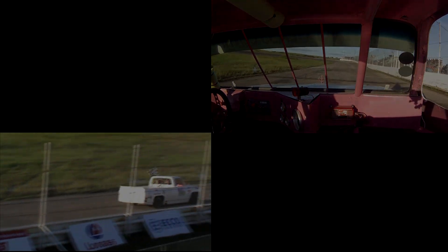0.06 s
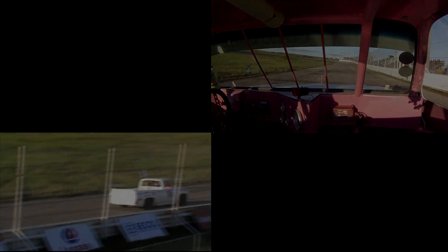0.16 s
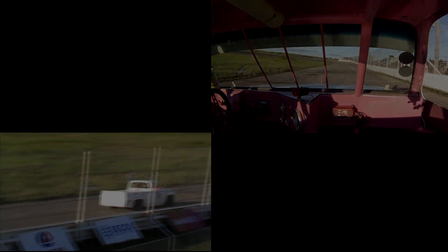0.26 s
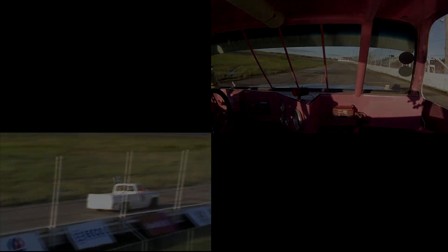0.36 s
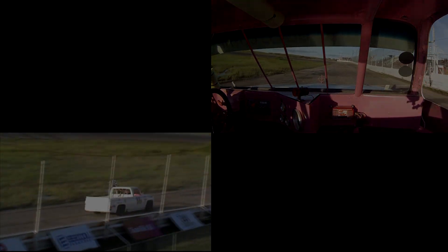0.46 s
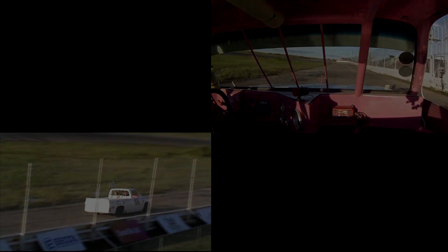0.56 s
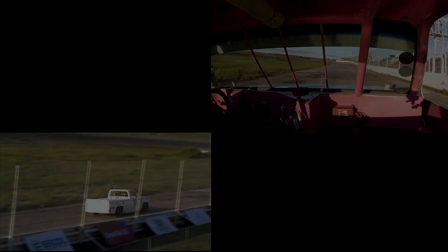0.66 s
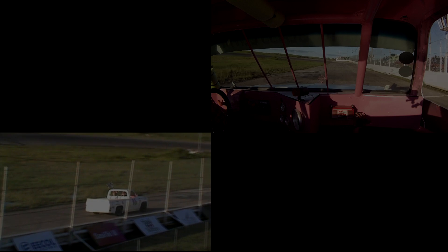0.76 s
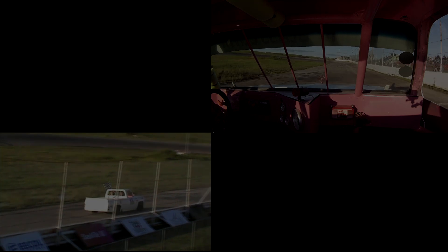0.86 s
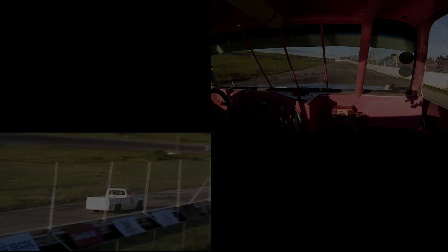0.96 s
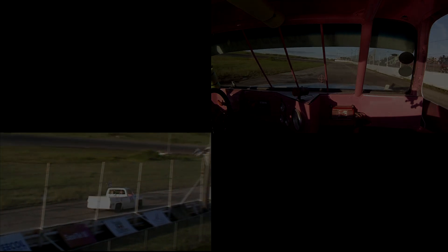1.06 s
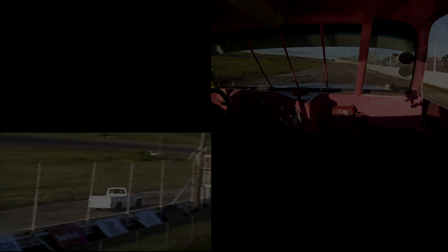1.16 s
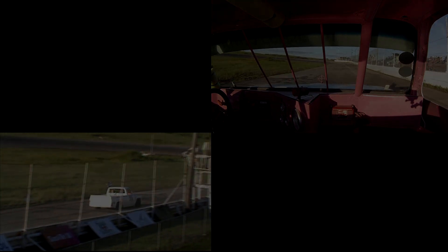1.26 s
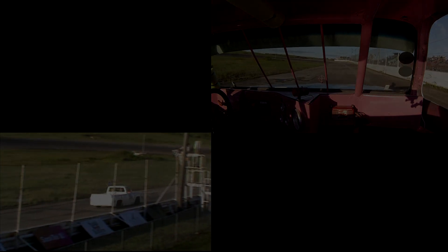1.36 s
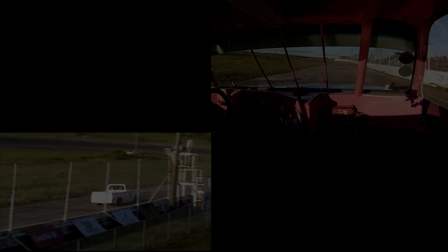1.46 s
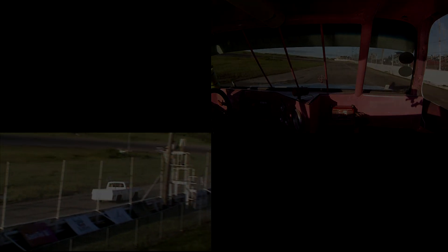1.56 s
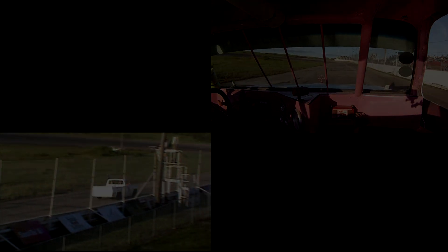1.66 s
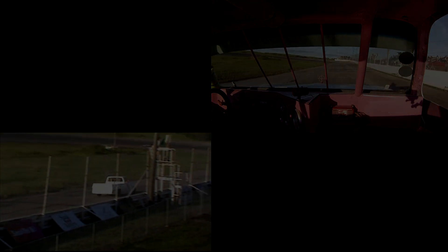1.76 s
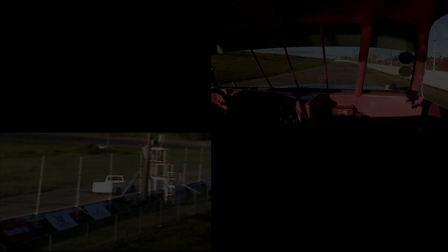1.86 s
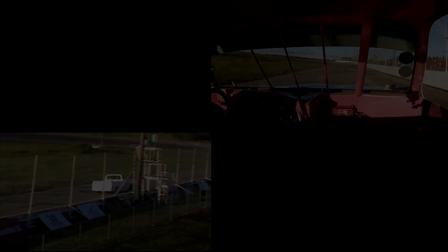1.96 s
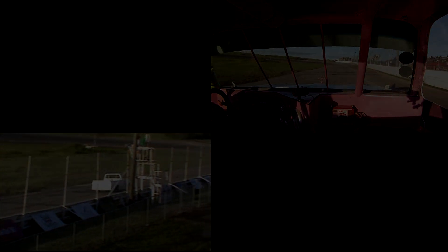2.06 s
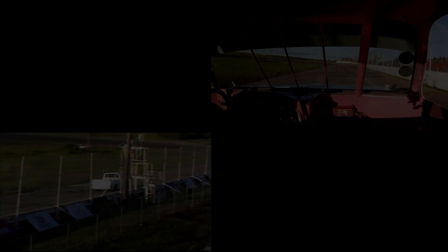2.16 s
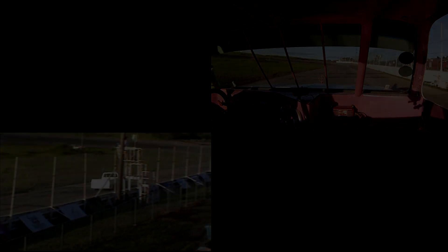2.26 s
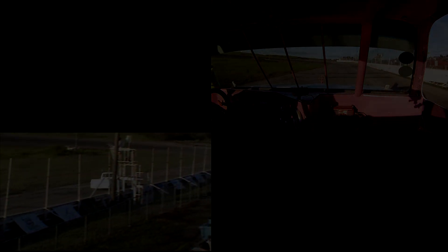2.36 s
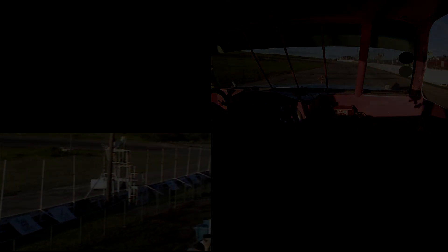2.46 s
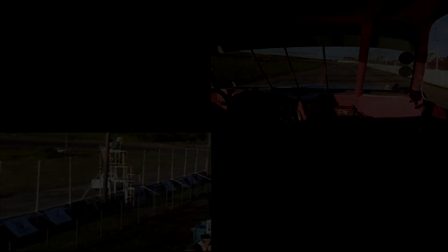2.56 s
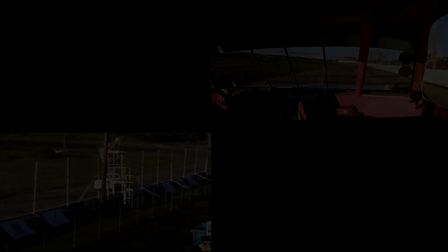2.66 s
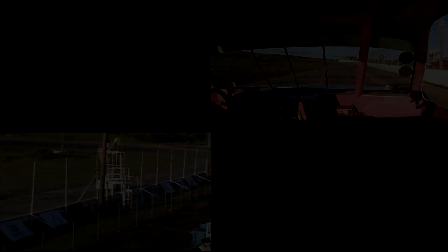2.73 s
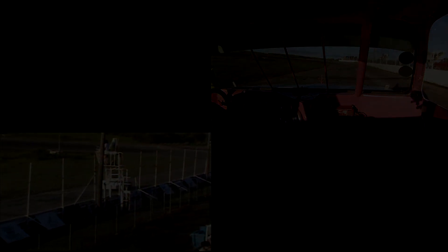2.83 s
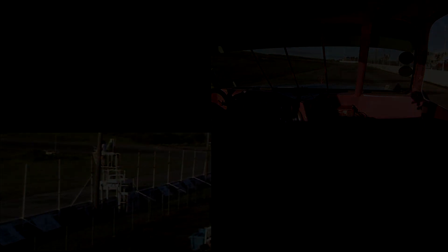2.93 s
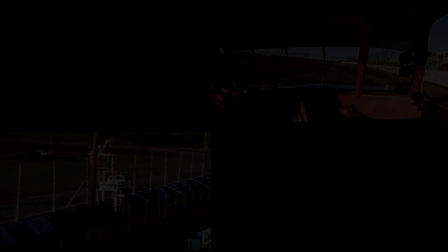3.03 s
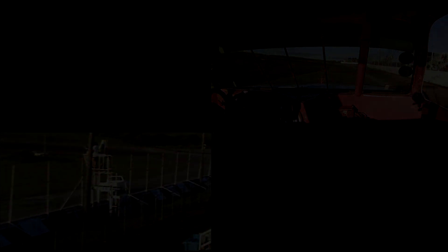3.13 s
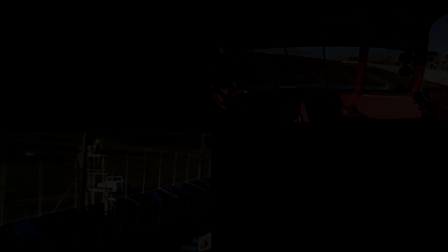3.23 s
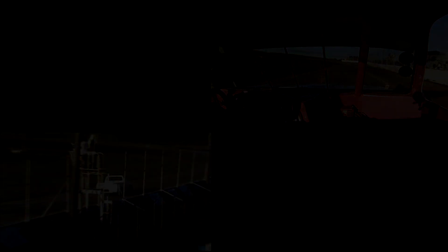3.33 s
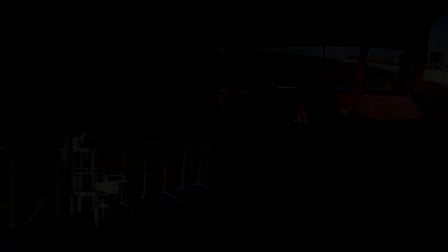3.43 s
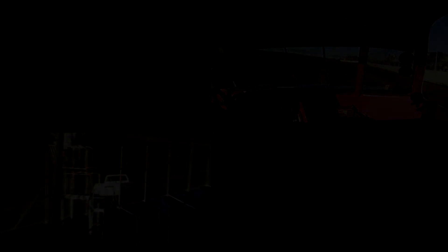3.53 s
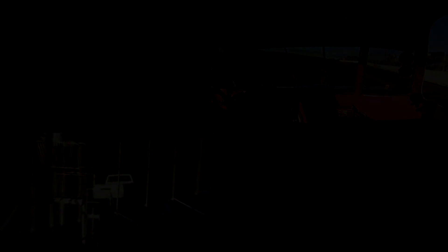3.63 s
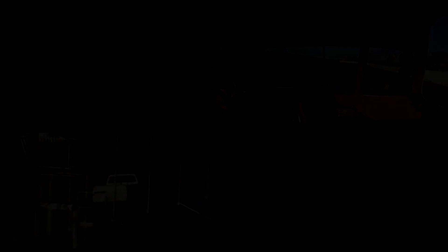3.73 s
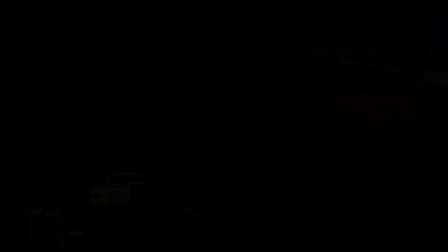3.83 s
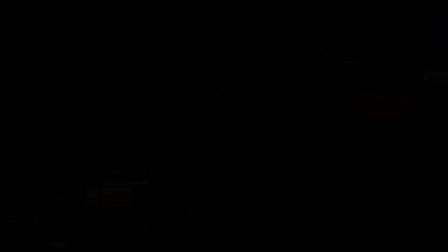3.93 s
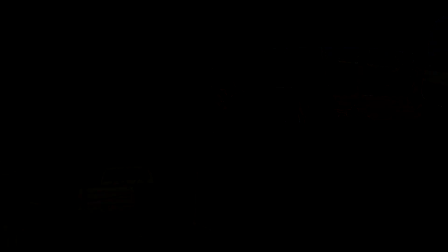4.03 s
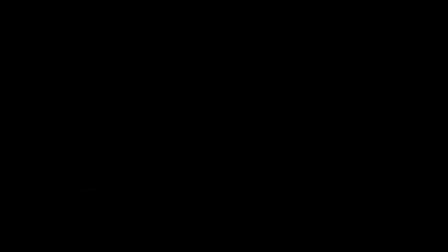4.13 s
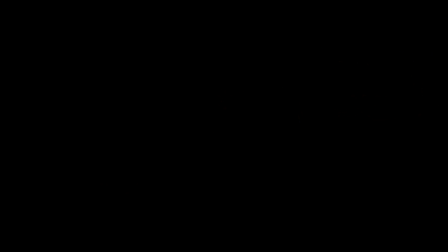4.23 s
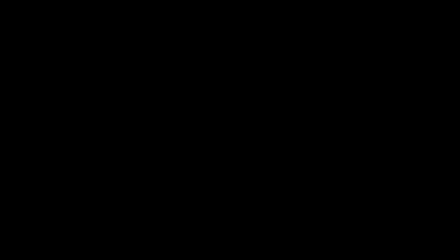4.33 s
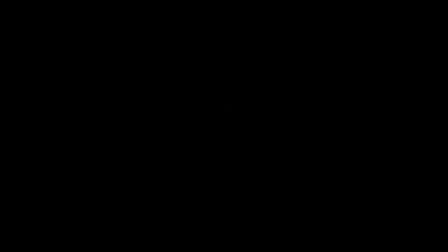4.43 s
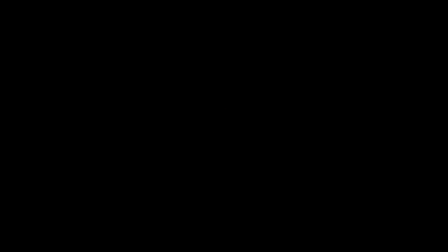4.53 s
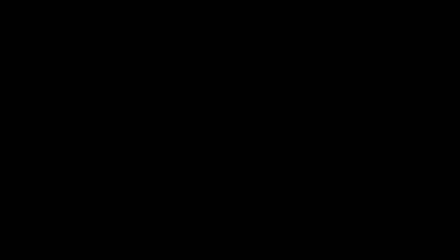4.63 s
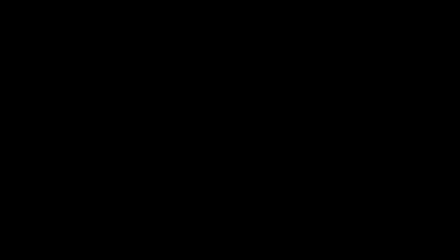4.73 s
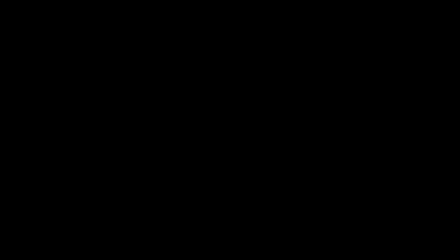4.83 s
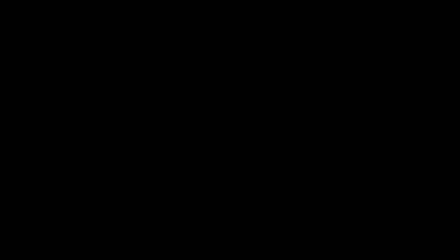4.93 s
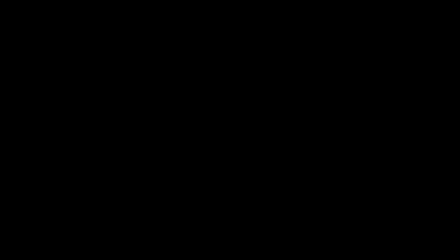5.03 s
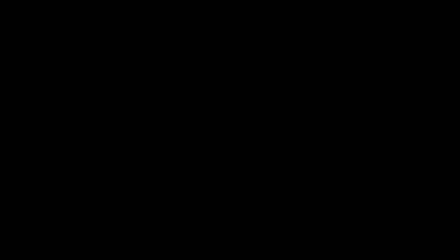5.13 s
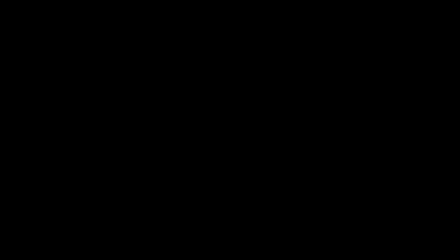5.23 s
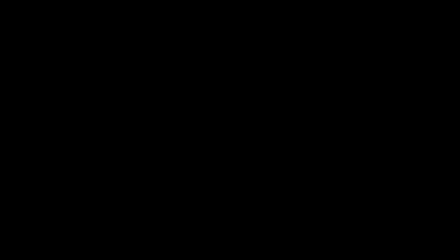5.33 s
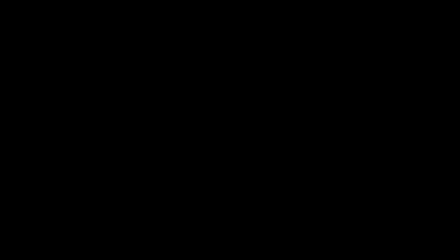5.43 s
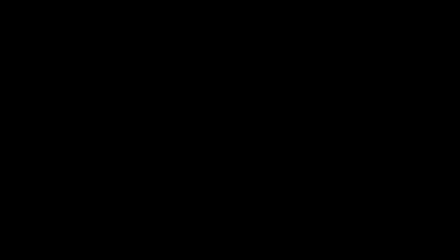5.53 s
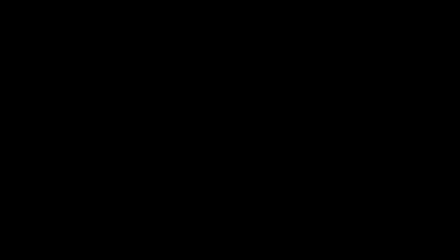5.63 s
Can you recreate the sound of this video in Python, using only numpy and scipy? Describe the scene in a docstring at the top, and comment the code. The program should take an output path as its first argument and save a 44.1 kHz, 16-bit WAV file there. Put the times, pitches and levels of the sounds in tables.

```python
"""V8 race truck in its bare cab: three rough stabs of throttle, then a long run-down to idle.
Engine: wavering cosine orders and scattered firing impulses ring the cab; filtered clicks crack and pop.
Gas: noise puffed by each firing. Track, tyres, panel: filtered noise. Shell knocks: clicks through resonances.
Loose metal: noise bursts rattle and decaying sines clank as the truck slows and the sound fades."""
import sys
import numpy as np
from scipy import signal
from scipy.fft import rfft, irfft
from scipy.io import wavfile
from scipy.ndimage import uniform_filter1d

SR = 44100
rng = np.random.default_rng(int(sys.argv[2]) if len(sys.argv) > 2 else 0)


def unload_audio(sound):
    """Save the sound as a 16-bit wav file, at the path given as the first command line argument."""
    columns = np.transpose(np.atleast_2d(sound))
    # keep every value between -1 and 1, then stretch to whole-number steps
    steps = np.round(np.clip(columns, -1, 1) * 32767)
    wavfile.write(sys.argv[1], SR, steps.astype(np.int16))


N = 250648
T = np.arange(N) / SR
HZ = np.fft.rfftfreq(2 * N, 1 / SR)  # bins of the zero-padded FFT

# engine speed, four-stroke cycles: [t/s, rate/Hz]
CYCLE_RATE = [(0.0, 28.0), (0.2, 39.0), (0.41, 50.0), (0.64, 48.2), (0.79, 51.6), (1.04, 49.1),
              (1.21, 52.3), (1.32, 50.1), (1.8, 43.0), (2.16, 38.1), (2.52, 33.5), (3.6, 21.4), (4.0, 18.0),
              (4.4, 15.1), (4.7, 13.8), (5.05, 11.6), (5.68, 10.4)]
# stabs of throttle: [opens/s, closes/s, opening/0-1]
THROTTLE_STABS = [(-0.05, 0.459, 0.7), (0.655, 0.899, 0.99), (1.057, 1.284, 1.0)]
# engine loudness in the cab, before the throttle's boom trim: [t/s, boom/dB, bark/dB]
ENGINE_LEVEL = [(0.0, -22, -24), (0.11, -20.5, -23), (0.15, -28.5, -23), (0.55, -28.5, -23.5),
                (1.53, -30.5, -24), (1.71, -29, -27), (1.99, -34, -24.5), (2.18, -28.5, -28),
                (2.26, -36, -26.5), (2.36, -29, -26), (3.1, -34.5, -27.5), (3.42, -31, -29.5),
                (3.75, -29.5, -34), (4.15, -32.5, -36.5), (4.5, -32.5, -38), (4.85, -38, -42),
                (5.27, -43.5, -43), (5.33, -48.5, -42), (5.39, -49, -48.5), (5.68, -53.5, -49.5)]
# cycle rates at which the order balance is given: [rate/Hz]
ORDER_REVS_HZ = [17, 23, 30, 39, 49]
# engine orders: [multiple of cycle rate, then relative level/dB at each of ORDER_REVS_HZ]
ORDER_LEVELS = [(1, 2, -11, -14, -14, -17), (2, 12, -14, -1, -16, -9), (3, 3, 10, 0, 14, -1),
                (4, 5, 8, 7, -9, -8), (5, 10, 20, 4, 2, -1), (6, 16, 11, -4, -5, 5), (7, 13, 8, -16, 0, -4),
                (8, 20, 11, 5, 2, -2), (9, 11, 7, 2, -1, 0), (10, 10, -2, -7, 0, -6),
                (11, 10, 8, 0, -15, -3), (12, 4, -1, -2, -7, 2), (13, 6, -4, -3, -7, -2),
                (14, 6, -1, 2, 0, -2), (15, 0, -6, -6, 1, 2), (16, 6, -1, -5, -6, -10),
                (17, 5, -2, 1, -1, -7), (18, -10, -14, -11, -5, -1), (19, -5, -4, -4, 1, -8),
                (20, -5, -8, -2, -7, -2), (21, -2, -17, -5, -6, -6), (22, -2, -10, -1, -9, -5),
                (23, -11, -12, -3, -5, -8), (24, -12, -8, -11, -9, -6)]
# cab resonances: [f/Hz, nominal width/Hz, relative level/dB]
CAB_MODES = [(53, 60, -13.5), (85.9, 4, -4.5), (127, 9.7, -18.5), (165.3, 18, -3), (222.3, 30.7, 1.5),
             (267.4, 26, -1.3), (336.5, 18, -8), (393.7, 35, -0.6), (482.4, 39, 4.5), (559.7, 18, 5.5),
             (594.7, 42, 1.3), (682.5, 90, -1), (778.6, 36, -3.5), (920, 61, -15.5), (1012, 14, -12.5),
             (1147, 792, -22)]
# tyre noise against the engine: [t/s, level/dB]
TYRE_LEVEL = [(2.3, -24), (3.0, -17), (3.6, -11), (4.5, -5), (5.0, 1)]
# sharp edge of each firing, in firing order: [relative level/dB]
CYLINDER_DB = [-5.5, -15.5, -4, -10, -16, -8, -12, -21]
# spectrum of exhaust-gas rasp: [f/Hz, relative density/dB]
RASP_SPECTRUM = [(400,-5.5),(850,4.5),(1000,-2.5),(1300,-5.5),(1600,-7),(1850,-12.5),(2050,-10),(2500,-12),(2800,-17.5),(3200,-17.5),(3600,-33)]
# spectrum of the thin gas hiss: [f/Hz, relative density/dB]
HISS_SPECTRUM = [(2800,-28.5),(3600,-7),(4200,2.5),(5500,-2.5),(7000,-8),(7700,-18.5),(9700,-18),(10600,-30),(11400,-19.5),(12200,-32.5),(13000,-31.5),(14000,-26)]
# hiss, sinking with the revs and swelling once on the way, before throttle gain: [t/s, level/dB]
HISS_LEVEL = [(0, -62), (0.2, -60), (1.3, -58.5), (2.05, -65), (2.58, -69.5), (3.08, -63), (3.27, -71.5),
              (4.9, -78), (5.68, -81.5)]
# rasp surges at the height of a stab, and once as the engine brakes: [middle t/s, half length/s, added share/dB]
RASP_SURGES = [(0.8, 0.03, -20), (1.19, 0.05, -15), (2.78, 0.066, -8)]
# spectrum of firing cracks from the open pipes: [f/Hz, relative density/dB]
CRACK_SPECTRUM = [(680, 2.5), (780, 6.5), (950, -0.5), (1250, -3.5), (1550, -10), (1800, -17),
                  (2600, -21.5)]
# crack, standing out as the engine brakes the truck: [t/s, level against bark/dB]
CRACK_LEVEL = [(0, -19), (1.25, -27.5), (2.0, -26), (2.85, -18.5), (3.5, -33), (5.68, -17.5)]
# exhaust pops under load: [t/s, peak level/dB]
POPS = [(0.16, -21.5), (0.193, -30.5), (0.238, -24), (0.3095, -24.5), (0.334, -23), (0.795, -17.5),
        (1.188, -24.5), (1.227, -22)]
# rumble of the track through the floor: [t/s, level/dB]
FLOOR_RUMBLE = [(0.0, -55), (3.2, -57), (3.5, -54), (5.3, -44), (5.68, -53.5)]
# floor shudders, mostly with the stabs: [middle t/s, half length/s, peak gain/dB]
FLOOR_SHUDDERS = [(0.04, 0.24, -37.5), (0.8, 0.091, -40), (1.18, 0.09, -38), (2.24, 0.073, -47)]
# body panel sings up as the truck rolls out: [middle t/s, half length/s, added peak gain/dB]
PANEL_SWELLS = [(3.45, 0.17, -38), (3.84, 0.061, -35)]
# bumps knocking the shell: [t/s, relative level/dB]
SHELL_BUMPS = [(4.609, -23.5), (4.629, -23.5), (5.286, -24.5), (5.321, -23), (5.334, -36)]
# jolts of loose metal: [t/s, relative level/dB, contact hardness/dB]
METAL_JOLTS = [(2.7127, -36.5, -23.5), (3.107, -41.5, -17), (3.4182, -39.5, -21), (3.573, -41.5, -32),
               (3.904, -45, -24), (3.93, -42.5, -26), (4.0777, -37.5, -18.5), (4.146, -47.5, -26),
               (4.343, -42.5, -20), (4.407, -44.5, -19), (4.6086, -35.5, -26), (4.7102, -37.5, -26),
               (4.7415, -44, -23), (4.9488, -41.5, -22), (5.105, -45, -26), (5.229, -48.5, -29),
               (5.3196, -43.5, -24), (5.5195, -50, -38), (5.6005, -62, -7)]
# ring of the loose sheet metal: [f/Hz, relative density/dB]
TIN_SPECTRUM = [(900,-7.5),(1200,11),(1400,-9),(1600,7),(1850,-15),(2080,9.5),(2300,-7),(2500,8.5),(2750,-6.5),(3100,1),(3600,-18)]
# bright edge of a hard contact: [f/Hz, relative density/dB]
EDGE_SPECTRUM = [(3600,-8),(4200,-2),(5300,-2.5),(7000,-13),(7800,-19),(9700,-37),(12000,-40)]
# modes of the sheet metal: [f/Hz before detuning, mean level/dB, t60/s]
TIN_MODES = [(1220, 6.5, 0.033), (1540, -2, 0.057), (1520, 6.5, 0.068), (2060, -16, 0.046),
             (2120, -13.5, 0.074), (2510, -3, 0.087), (2950, -3.5, 0.14), (2980, -12, 0.042),
             (3460, -8.5, 0.067)]

THROTTLE_ATTACK_S, THROTTLE_RELEASE_S = 0.018, 0.056
# uneven burning, 0-1: coasting, on the throttle, sinking towards idle
COAST_ROUGH, THROTTLE_ROUGH, IDLE_ROUGH = 0.1, 0.72, 0.76
IDLE_HZ, STUMBLE_HZ = 11.92, 4.2  # idle cycle rate; decay span of stumbling above it
SPEED_WOBBLE = 0.01594  # rev waver share per unit roughness
LUG_HZ, LUG_DB_PER_HALF_OCTAVE = 46, 2  # pulling hard below this rate
BOOM_THROTTLE_DB, HISS_THROTTLE_DB = -1.5, 1.5  # at full throttle
RASP_UNDER_BARK_DB, RASP_ROUGH_DB = -21, 5  # offset; gain per unit roughness
RASP_DB_PER_OCTAVE = 1  # with revs above idle
CRACK_JITTER_S = 0.00009
PANEL_DB = -50  # quiet ringing between swells
TOP_HZ = 13800


def undb(db):
    """Decibels to gain."""
    return 10 ** (np.asarray(db) / 20)


def curves(table):
    """Each column of a table as a line through time."""
    s, *columns = np.transpose(table)
    return [np.interp(T, s, column) for column in columns]


def swells(table):
    """Summed gain of bell-shaped swells, one per row."""
    return sum(undb(db) * np.exp(-((T - s) / half_s) ** 2) for s, half_s, db in table)


def unit(x):
    """Scale to rms 1."""
    return x / np.sqrt(np.mean(x ** 2))


def even(x, size=8000):
    """Scale to rms 1 all along, keeping the quick flutter; size in samples."""
    power = uniform_filter1d(uniform_filter1d(x ** 2, size), size // 2)
    return x / np.sqrt(power + 1e-18)


def noise():
    """White noise."""
    return rng.standard_normal(N)


def walk(rate_hz):
    """Random line through points at this rate, spread near 1."""
    return np.interp(T * rate_hz, np.arange(4000), 1.133 * rng.standard_normal(4000))


def ring(x, gain):
    """Causal minimum-phase filter with the given gain at each frequency."""
    cepstrum = irfft(np.log(gain + 1e-6))
    cepstrum[1:N] *= 2
    cepstrum[N + 1:] = 0
    return irfft(rfft(x, 2 * N) * np.exp(rfft(cepstrum)))[:N]


def colour(points):
    """Gain through (f/Hz, level/dB) points, steep past the ends."""
    hz, db = np.transpose(points)
    gain = undb(np.interp(np.log(HZ + 1), np.log(hz), db))
    return gain / (1 + (0.72 * hz[0] / (HZ + 1)) ** 6 + (0.89 * HZ / hz[-1]) ** 6)


def resonances(modes):
    """Power-summed gain of steep-sided resonances."""
    return np.sqrt(sum(undb(2 * db) / (1 + ((HZ - hz) / (0.68 * width)) ** 2) ** 2
                       for hz, width, db in modes))


def clicks(times_s, sizes):
    """Single-sample impulses."""
    return np.bincount(np.clip(np.asarray(times_s) * SR, 0, N - 1).astype(int), sizes, N)


def throttle():
    """Opening 0-1: each stab rises quickly, holds and dies away exponentially."""
    pedal = 0
    for opens, closes, opening in THROTTLE_STABS:
        rise = 1 - np.exp(-np.maximum(T - opens, 0) / THROTTLE_ATTACK_S)
        release = np.exp(-np.maximum(T - closes, 0) / THROTTLE_RELEASE_S)
        pedal = pedal + opening * rise * release
    return pedal


def roughness(revs_hz, pedal):
    """Burning turns uneven under load and near idle."""
    idling = np.exp(-np.maximum(revs_hz - IDLE_HZ, 0) / STUMBLE_HZ)
    loaded = (THROTTLE_ROUGH - COAST_ROUGH) * pedal
    return np.clip(COAST_ROUGH + loaded + (IDLE_ROUGH - COAST_ROUGH) * idling, 0, .95)


def exhaust(turn, revs_hz, pedal, rough, waver_db=3.5, load_waver_db=2, burble_db=4.0, drift=0.044,
            load_drift=0.12, phase_spread=0.72, high_db=-7, fall_db=0.2, count=42):
    """Unequal cylinders throb as cycle-rate orders; roughness mixes in random-strength firings."""
    levels = [np.interp(revs_hz, ORDER_REVS_HZ, row[1:]) for row in ORDER_LEVELS]
    levels += [high_db - fall_db * k for k in range(count - len(levels))]

    # lugging: firing order stands out, orders below it fall back
    lug_db = LUG_DB_PER_HALF_OCTAVE * pedal * np.maximum(2 * np.log2(LUG_HZ / revs_hz), 0)
    firing = len(CYLINDER_DB) - 1
    below = [db - lug_db for db in levels[:firing]]
    levels = below + [levels[firing] + .5 * lug_db] + levels[firing + 1:]

    stack = 0
    for k, db in enumerate(levels):
        wander = (drift + load_drift * pedal) * min(k / 10, 1)
        phase = (k + 1) * turn + phase_spread * rng.random() + wander * walk(14)
        order_db = db + waver_db * walk(5 + k / 2) + load_waver_db * rough * walk(15)
        stack = stack + undb(order_db) * np.cos(2 * np.pi * phase)
    stack = stack * undb(burble_db * rough * walk(45))  # some cycles burn harder

    firings_s = np.interp(np.arange(0, turn[-1], 1 / 8), turn, T)
    scatter = clicks(firings_s, rng.standard_normal(len(firings_s))) + 0.023 * noise()
    cab = resonances(CAB_MODES)
    # short pops carry little bass
    burst = colour([(40, -16.5), (120, -5.5), (165, -6), (235, -3.0), (400, -3.5), (600, -0.5),
                    (780, 1), (1400, -1.0)])
    steady = even(ring(stack, cab)) * np.sqrt(1 - rough ** 2)
    return steady + rough * even(ring(scatter, cab * burst))


def cab_sound(engine, boom_db, bark_db, split_hz=315):
    """Engine and cab-filtered tyre noise, levelled in two bands; tyres take over as the engine dies down."""
    tread = colour([(60, -12.5), (115, -4.5), (160, -11.0), (225, 4.0), (280, -0.5), (390, 2.5),
                    (560, -4.0), (780, 2.0), (900, -2.0), (1300, -9.0)])
    tyres = even(ring(noise() * undb(2.9 * walk(35)), resonances(CAB_MODES) * tread))
    spectrum = rfft(engine + tyres * undb(curves(TYRE_LEVEL)[0]), 2 * N)
    low = 1 / (1 + (HZ / split_hz) ** 12)
    boom = irfft(spectrum * low)[:N]
    bark = irfft(spectrum * (1 - low))[:N]
    return even(boom) * undb(boom_db) + even(bark) * undb(bark_db)


def firing_cracks(turn, rough, level_db, scatter_db=3):
    """Pipe-filtered firing clicks, fixed per cylinder but scattered with roughness; plus loud pops."""
    count = len(CYLINDER_DB)
    times_s = np.interp(np.arange(0, turn[-1], 1 / count), turn, T)
    times_s = times_s + CRACK_JITTER_S * rng.standard_normal(len(times_s))
    scatter = scatter_db * np.interp(times_s, T, rough) * rng.standard_normal(len(times_s))
    db = np.resize(CYLINDER_DB, len(times_s)) + scatter
    pipe = colour(CRACK_SPECTRUM)
    pops_s, pop_db = np.transpose(POPS)
    pop_peak = np.abs(ring(clicks([0], [1.]), pipe)).max()
    pops = ring(clicks(pops_s, undb(pop_db)), pipe) / pop_peak
    return even(ring(clicks(times_s, undb(db)), pipe)) * undb(level_db) - pops


def gas(turn, rasp_db, hiss_db, puff_db=9, puff_length=0.87, hiss_throb=0.31):
    """Each firing puffs turbulent gas by cylinder strength; hiss throbs less. Puff length in firings."""
    firing, since = np.divmod(turn * len(CYLINDER_DB), 1)
    cylinder_db = np.take(CYLINDER_DB, firing.astype(int), mode="wrap")
    puffs = 1 + undb(puff_db + cylinder_db) * np.exp(-since / puff_length)
    rasp = unit(ring(noise() * puffs * undb(1.5 * walk(40)), colour(RASP_SPECTRUM)))
    hiss = unit(ring(noise() * puffs ** hiss_throb * undb(0.94 * walk(40)), colour(HISS_SPECTRUM)))
    return rasp * undb(rasp_db) * (1 + swells(RASP_SURGES)) + hiss * undb(hiss_db)


def body():
    """Track noise shakes the floor, narrow-band noise sings in a panel, impulses ring the shell."""
    shake = np.hypot(undb(curves(FLOOR_RUMBLE)[0]), swells(FLOOR_SHUDDERS))
    floor_colour = colour([(12, -5.0), (30, -4.5), (55, -0.5), (85, -2.0), (130, -5.5)])
    floor = even(ring(noise(), floor_colour)) * shake
    panel = even(ring(noise(), resonances([(774.6, 29.0, 0.0017)])), size=4000)
    panel = panel * (undb(PANEL_DB) + swells(PANEL_SWELLS))
    bumps_s, db = np.transpose(SHELL_BUMPS)
    shell = resonances([(326, 25, -11), (545, 12, -4.5), (665, 58, -5.5), (760, 38, 2.0)])
    knock = ring(clicks([0], [1.]), shell)
    knocks = ring(clicks(bumps_s, undb(db - 4.5)), shell) / np.abs(knock).max()
    return floor + panel + knocks


def rattles(decay_s=0.031, strike_s=0.004, strike_db=2, grain_db=3.2, peak_db=-14, edge_db=10,
            loose_db=-60):
    """Jolts make sheet metal chatter as grainy noise, brighter when hard; lighter chatter runs between."""
    jolts, edges = 0, 0
    for s, db, hard_db in METAL_JOLTS:
        since = np.abs(T - s)
        decay = np.exp(-since / decay_s) + undb(strike_db) * np.exp(-since / strike_s)
        jolt = undb(db + peak_db) * (T >= s) * decay
        jolts = jolts + jolt
        edges = edges + jolt * undb(hard_db + edge_db)
    loose = undb(loose_db + 1.9 * walk(35))
    loose = loose * np.interp(T, [2.4, 3.5, 4.8, 5.68], [0.13, 0.66, 0.44, 0.4])
    contacts = unit(noise() * undb(grain_db * walk(450)))
    chatter = ring(contacts * (jolts + loose), unit(colour(TIN_SPECTRUM)))
    return chatter + ring(contacts * edges, unit(colour(EDGE_SPECTRUM)))


def clanks(peak_db=-17, vary_db=3.5, bounce_s=0.012, bounce_db=-6.5, count=4):
    """Struck sheet metal bounces, each contact ringing a different mix of decaying modes."""
    out, t = np.zeros(N + SR), T[:SR // 5]
    hz, mode_db, t60_s = np.transpose(TIN_MODES)[:, :, None]
    for s, db, _ in METAL_JOLTS:
        for k in range(count):
            mix, detune = rng.standard_normal((2, len(hz), 1))
            tones = np.sin(2 * np.pi * hz * (1 + .008 * detune) * t)
            modes = undb(mode_db + vary_db * mix) * tones * np.exp(-np.log(1000) * t / t60_s)
            contact = (np.sign(detune) * modes).sum(0)  # random polarity per mode
            start = int(s * SR)
            out[start:start + len(t)] += undb(db + peak_db + k * bounce_db) * contact
            s = s + bounce_s * (.5 + rng.random())
    return out[:N]


def scene():
    """Revs and throttle drive engine and gas; all sources sum to one channel."""
    revs_hz, pedal = curves(CYCLE_RATE)[0], throttle()
    rough = roughness(revs_hz, pedal)
    turn = np.cumsum(revs_hz * (1 + SPEED_WOBBLE * rough * walk(25))) / SR  # engine cycles
    boom_db, bark_db = curves(ENGINE_LEVEL)
    rasp_db = bark_db + RASP_UNDER_BARK_DB + RASP_ROUGH_DB * rough
    rasp_db = rasp_db + RASP_DB_PER_OCTAVE * np.log2(revs_hz / IDLE_HZ)
    hiss_db = curves(HISS_LEVEL)[0] + HISS_THROTTLE_DB * pedal
    boom_db = boom_db + BOOM_THROTTLE_DB * pedal
    engine = cab_sound(exhaust(turn, revs_hz, pedal, rough), boom_db, bark_db)
    cracks = firing_cracks(turn, rough, bark_db + curves(CRACK_LEVEL)[0])
    mix = engine + cracks + gas(turn, rasp_db, hiss_db) + body() + rattles() + clanks()
    return mix[None]


def record(dry):
    """Steep elliptic low-pass cuts the top."""
    return signal.sosfilt(signal.ellip(8, .2, 70, TOP_HZ, fs=SR, output="sos"), dry)


dry = scene()
out = record(dry)
unload_audio(out)
```